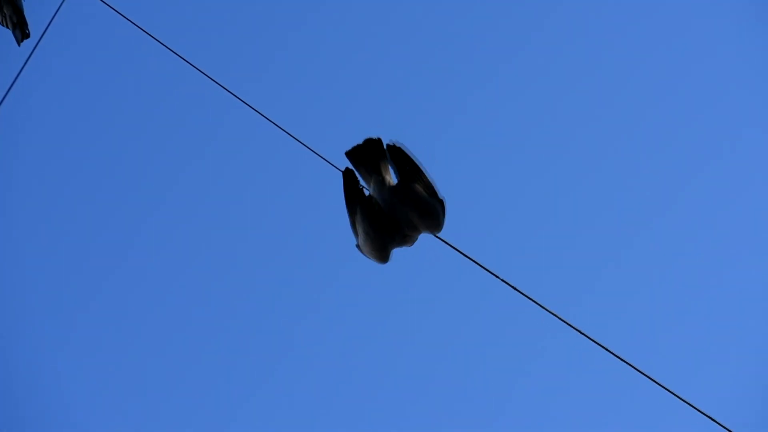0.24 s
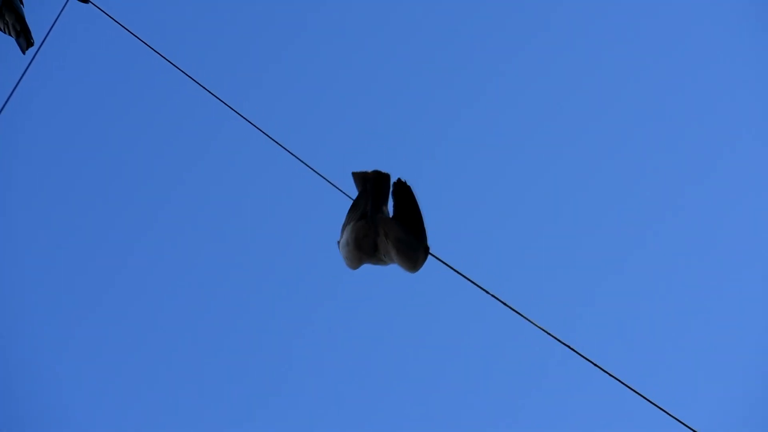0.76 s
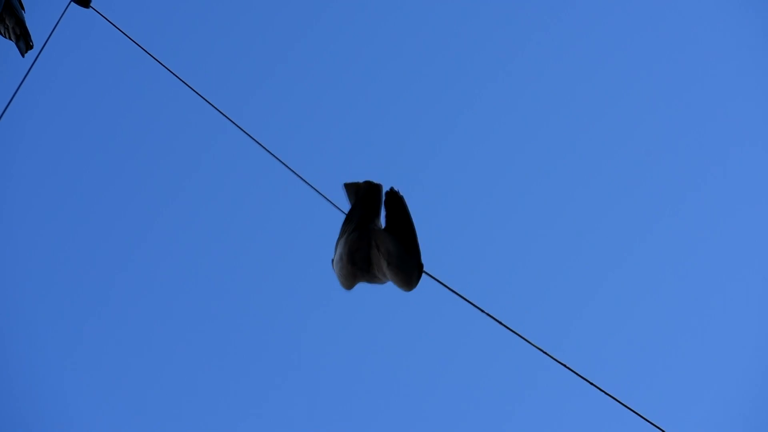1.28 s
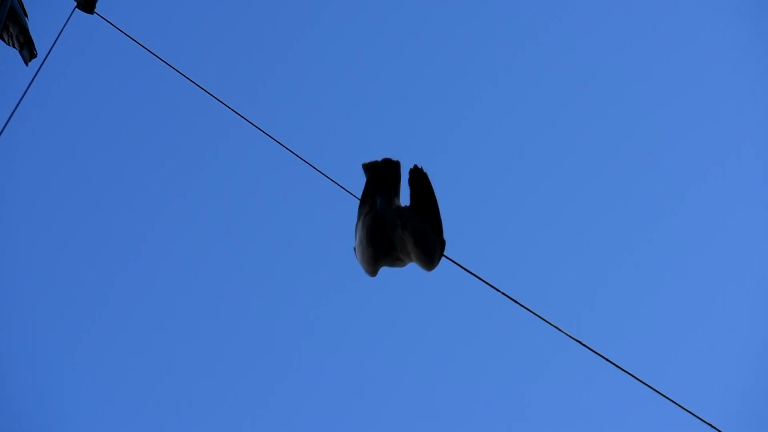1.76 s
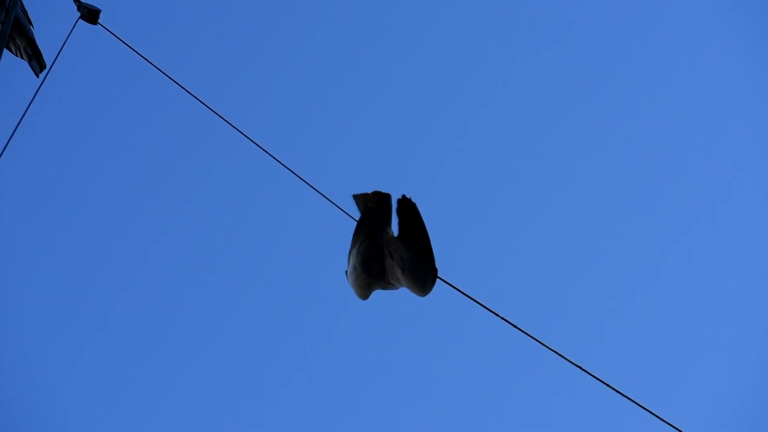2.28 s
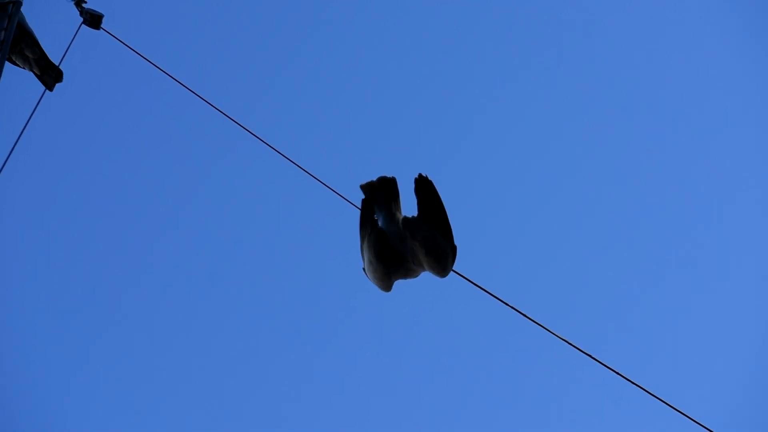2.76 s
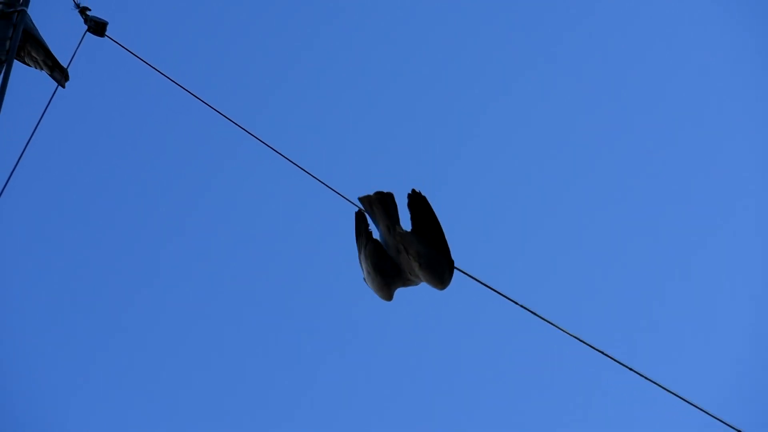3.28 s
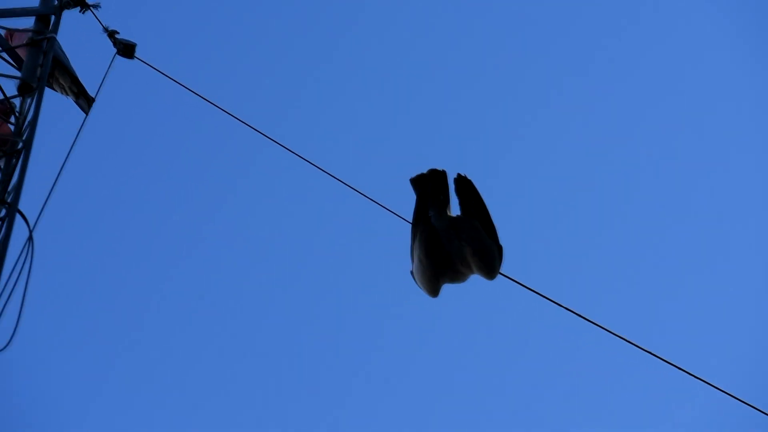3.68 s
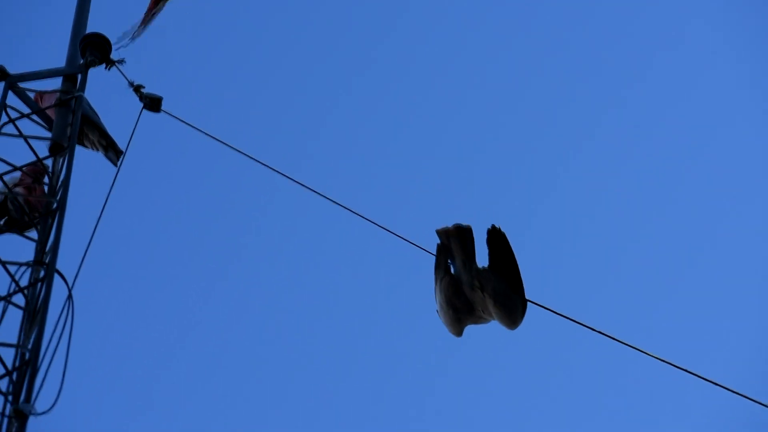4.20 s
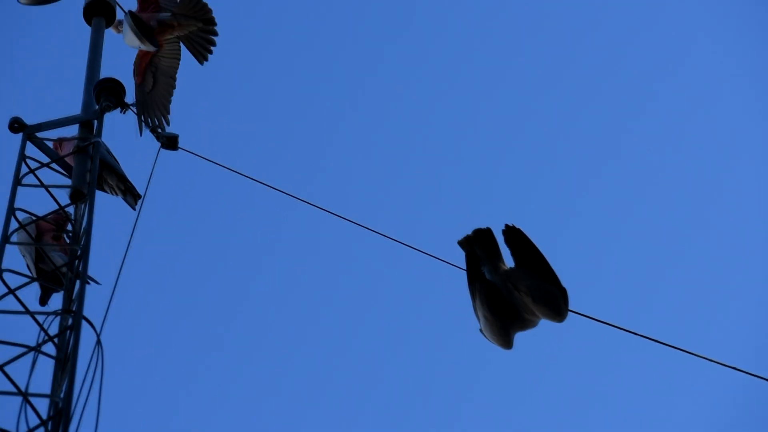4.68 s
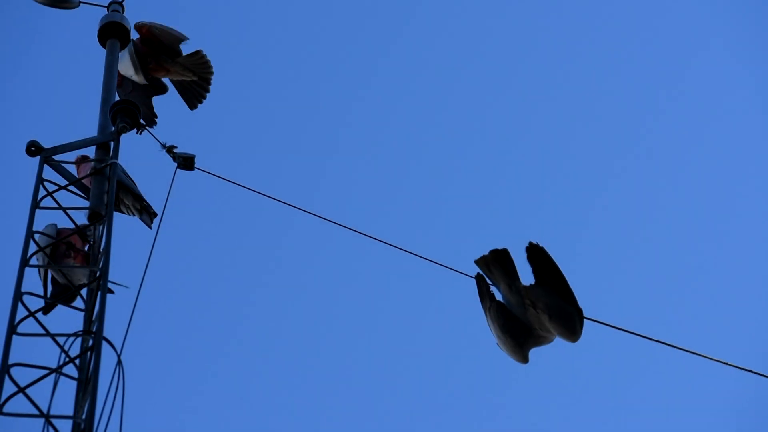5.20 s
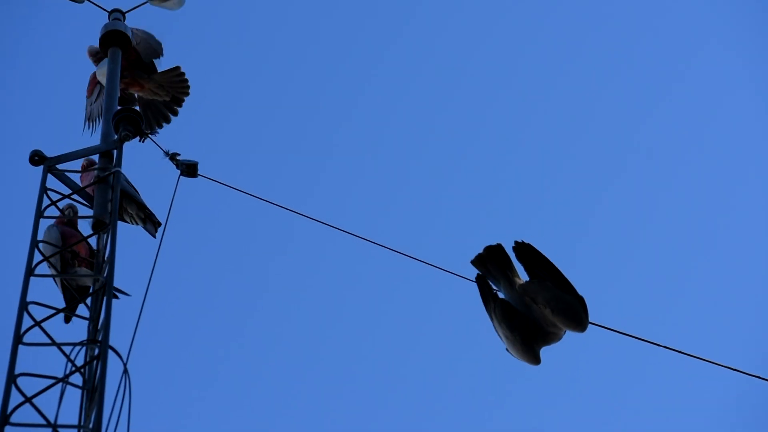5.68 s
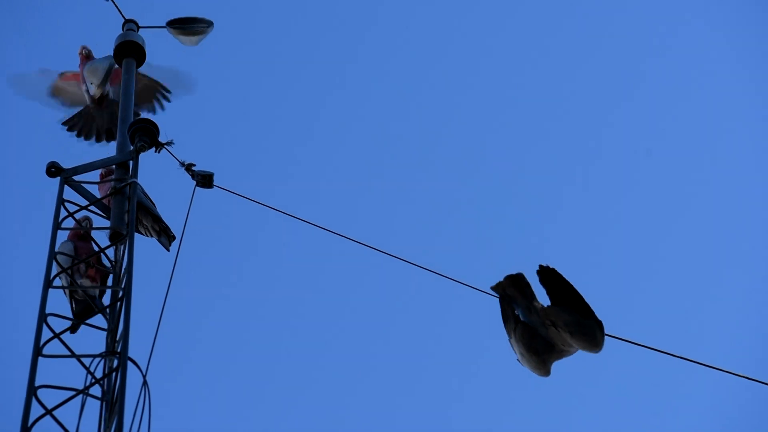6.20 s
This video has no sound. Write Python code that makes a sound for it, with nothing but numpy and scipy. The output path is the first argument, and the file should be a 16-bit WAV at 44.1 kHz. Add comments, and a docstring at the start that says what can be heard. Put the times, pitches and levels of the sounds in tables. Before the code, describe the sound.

Cockatoos squabble outdoors with two loud, shrill shrieks, harsh overlapping screeches and chirps over a soft hush.

```python
"""Outdoors by a wire and a steel mast, a stereo pair close to squabbling galahs, more off in the trees.
Each bird has two voices, a high whistle and a low buzz. Alone they give chirps and clucks; together
they beat into a harsh screech. The nearest bird shrieks twice. Feathers rustle, the mast clanks twice,
and ground, roofs and trees throw the calls back over a soft hush."""
import sys
import numpy as np
from scipy import signal
from scipy.fft import rfft, irfft, next_fast_len
from scipy.io import wavfile
from scipy.ndimage import uniform_filter1d, minimum_filter1d, map_coordinates

SR = 44100
rng = np.random.default_rng(int(sys.argv[2]) if len(sys.argv) > 2 else 0)


def unload_audio(sound):
    """Save the sound as a 16-bit wav file, at the path given as the first command line argument."""
    columns = np.transpose(np.atleast_2d(sound))
    # keep every value between -1 and 1, then stretch to whole-number steps
    steps = np.round(np.clip(columns, -1, 1) * 32767)
    wavfile.write(sys.argv[1], SR, steps.astype(np.int16))


N = 284445


def both_voices(hz, db, rasp, low_hz=770, sag=0.149):
    """The low voice chops and bends the high one into sidebands; more rasp breaks it into noisy slaps."""
    # The throat with the beak wide open. Each row: frequency in Hz, gain in dB.
    open_throat = [(500, -31.5), (2000, -22.5), (3100, -2.5), (4300, -5.5), (5400, 0), (6700, -4),
                   (8000, -7.5), (11500, -47), (16000, -24)]
    # Strength of the octave. Each row: pitch in Hz, level against the fundamental in dB.
    octave = [(2850, 0.5), (3400, -13.5), (4000, -11.5), (4700, -21)]
    count, rasp = len(hz), np.clip(rasp, 0, 1)
    low_jitter = .1 * wander(count, 110) + .05 * wander(count, 700)
    low = phase_of(low_hz * (1 + sag * np.linspace(.5, -.5, count) + low_jitter))  # sags as the call ends
    scatter = .015 * wander(count, 110) + .04 * np.sqrt(rasp) * wander(count, 700)
    phase = phase_of(hz * (1 + scatter)) + .85 * rasp * np.sin(low)
    chop = 1 + rasp * np.cos(low)  # in step with the bend, so the upper sidebands win
    overtones = amp(read(octave, hz)) * (np.sin(2 * phase) + np.sin(3 * phase) / 7)
    tone = unit(chop * (np.sin(phase) + overtones))
    slaps = colour(np.exp(2 * np.cos(low)) * rng.standard_normal(count), open_throat)
    noise_share = .45 * rasp ** 1.3
    voice = np.sqrt(1 - noise_share) * tone + np.sqrt(noise_share) * slaps
    buzz = (np.sin(low) + .7 * np.sin(2 * low)) * amp(5 * wander(count, 110))
    voice += amp(-17 - .5 * np.maximum(db + 20, -2)) * rasp * buzz  # a smaller part of loud calls
    throb_db = 2.3 * np.sqrt(rasp) * wander(count, 260)
    return unit(voice * amp(throb_db)) * amp(db) * fade(count, 0.002)


def screeches(mix, waver=0.0099, flutter_db=1.2, rise_s=0.016, fall_s=0.009):
    """The squabble: each call is one uneven swell of both voices, growing steadily harsher or cleaner."""
    # Each row: start and length in seconds, first, middle and last pitch in Hz, peak in dB,
    # place of the peak 0-1, first and last rasp 0-1.
    calls = [ (0.89, 0.13, 3560, 3817, 3700, -30, 0.78, 0.3, 0.089),
             (0.99, 0.15, 4270, 4210, 3875, -33.5, 0.27, 0.58, 0.92),
             (1.122, 0.026, 4290, 4170, 4040, -20, 0.73, 0.28, 0.11),
             (1.15, 0.14, 3920, 3960, 3810, -32.5, 0.13, .08, 0.28),
             (1.436, 0.0357, 3990, 4280, 4480, -16, 0.46, .6, 0.77),
             (1.585, 0.098, 3840, 3980, 3840, -38.5, .4, 0.19, 0.33),
             (1.89, 0.12, 4130, 3860, 3800, -37, 0.91, 0.87, .3),
             (1.98, 0.069, 3810, 3694, 3490, -27, 0.24, .05, 0.21),
             (2.13, .16, 3870, 3930, 3675, -29.5, 0.51, 0.23, 0.066),
             (2.452, 0.09, 3430, 3400, 3403, -24, 0.97, 0.36, 0.022),
             (2.53, 0.096, 2687, 2800, 2803, -25.5, 0.21, 0.22, 0.12),
             (2.645, 0.064, 3830, 3564, 3160, -23.5, 0.92, 0.66, .1),
             (2.703, .11, 2755, 2858, 2816, -25, 0.24, 0.11, 0.22),
             (3.785, 0.059, 3830, 3760, 3870, -39, 0.23, 0.042, .07),
             (3.89, .18, 3840, 3700, 3650, -38.5, 0.14, .03, 0.43),
             (4.07, 0.13, 4240, 4480, 4550, -38.5, 0.15, 0.22, 0.39),
             (4.19, 0.16, 3760, 3698, 3580, -34.5, 0.37, .03, 0.28),
             (4.34, 0.12, 3630, 3526, 3516, -36, 0.96, .5, 0.26),
             (5.003, 0.0435, 3890, 4004, 4100, -23, 0.65, 0.12, 0.36),
             (5.037, 0.11, 4014, 4030, 3970, -21.5, 0.1, 0.25, 0.97),
             (5.15, 0.127, 3743, 3796, 3710, -22.5, 0.16, 0.088, 0.88),
             (5.25, 0.16, 3750, 3840, 3866, -24, 0.36, 0.75, 0.29),
             (5.35, .11, 4220, 4330, 4280, -26.5, 0.35, 0.52, 0.86),
             (5.47, 0.14, 3693, 3990, 3876, -21, .42, 0.61, 1),
             (5.64, 0.22, 3484, 3174, 3410, -23, 0.34, 0.88, 0.32),
             (5.71, .15, 3880, 3883, 3780, -21, 0.32, 0.47, 0.75),
             (5.86, 0.15, 3740, 3730, 3770, -36.5, 0.38, 1, .2),
             (5.988, 0.13, 3980, 4800, 4760, -17, 0.53, 0.71, 0.63),
             (6.2, .19, 3876, 4000, 3967, -13.5, 0.45, 0.41, 0.64), ]
    for start, length, *pitches, db, peak_at, first_rasp, last_rasp in calls:
        u = progress(length)
        effort = wander(len(u), 60)  # moves pitch and level together
        hz = bow(u, *pitches) * (1 + waver * effort)
        level_db = db + swell(u, peak_at, edge_db=11.5, power=1.78) + flutter_db * effort
        rasp = first_rasp + (last_rasp - first_rasp) * u
        ramps = np.minimum(1, length * np.minimum(u / rise_s, (1 - u) / fall_s))
        place(mix, start, both_voices(hz, level_db, rasp) * ramps, wet_db=-2.5)


def shrieks(mix, rasp_hz=3950, drop_hz=1484, drop_s=0.0084, shrill_hz=5250, catch_s=0.0073):
    """The nearest bird: a rasp drops onto its pitch, then breaks into a shrill tone that dips and climbs."""
    # Each row: start, rasp length and tone length in seconds, pitch at the tone's dip in Hz, peak in dB.
    calls = [(0.377, .042, .042, 4680, -4), (0.619, .039, .043, 4560, -4)]
    for start, rasp_s, tone_s, dip_hz, db in calls:
        u, v = progress(rasp_s), progress(tone_s)
        falling_hz = rasp_hz + drop_hz * np.exp(-(u * rasp_s / drop_s) ** 2)
        rasp_db = db - 5 + swell(u, peak_at=0.56, edge_db=11.5, power=2)
        rasp = both_voices(falling_hz, rasp_db, rasp=0.41)
        tone_hz = dip_hz + (shrill_hz - dip_hz) * np.cos(np.pi * v) ** 2
        tone_db = db + swell(v, peak_at=0.66, edge_db=11.5, power=2)
        fray = 0.031 + 0.48 * (2 * v - 1) ** 4  # clean in the middle, rough at the ends
        tone = both_voices(tone_hz, tone_db, fray) * np.minimum(1, v * tone_s / catch_s)
        place(mix, start, np.concatenate([rasp, tone]), wet_db=-5.5)


def high_voice(hz, db, octave_db):
    """The whistle alone: a hoarse tone with an octave and three weak overtones above that."""
    count = len(hz)
    phase = phase_of(hz * (1 + .012 * (wander(count, 200) + wander(count, 900))))
    upper = sum(amp(under_octave_db) * np.sin(k * phase) * (k * hz < SR / 2)
                for k, under_octave_db in [(3, -22), (4, -33), (5, -44)])
    tone = np.sin(phase) + amp(octave_db) * (np.sin(2 * phase) + upper)
    shimmer_db = 1.3 * wander(count, 250) + wander(count, 1500)
    return np.sqrt(2) * tone * amp(db + shimmer_db) * fade(count, 0.00099)


def chirps(mix, waver=0.0135):
    """Wavering glides of the high voice; the octave flares as it passes the throat's resonance."""
    # Each row: start and length in seconds, first, middle and last pitch in Hz, peak in dB,
    # place of the peak 0-1, brightness in dB.
    notes = [ (0.0, 0.052, 2140, 2106, 2160, -42, 0.046, -16),
             (0.149, 0.01, 2750, 3440, 3400, -35, 0.55, -10), (0.164, 0.019, 2340, 2604, 2680, -35, 0.2, 1),
             (0.179, 0.019, 2600, 2438, 2190, -27.5, 0.4, 6), (0.26, .07, 2900, 2850, 2730, -45, 0.27, 2),
             (0.315, .047, 2710, 2934, 3690, -33.5, 1, 3.5), (0.363, 0.015, 5100, 4520, 3820, -12, 0.7, 1),
             (0.55, 0.078, 2110, 1957, 1490, -43.5, 0.58, -14),
             (0.583, 0.023, 2950, 3210, 3500, -22.5, .6, 0),
             (0.607, 0.0099, 3350, 3620, 4600, -8.5, 0.71, 6.5),
             (0.825, 0.032, 2450, 2525, 2200, -39.5, 0.27, -16),
             (1.1, 0.045, 2750, 2250, 2150, -30.5, 0.66, -6), (1.28, 0.043, 2230, 2510, 2980, -32, 1, -17),
             (1.318, 0.08, 2960, 3114, 2850, -26.5, 0.46, -3),
             (1.375, 0.058, 2874, 2538, 2435, -26.5, 0.62, 4.5),
             (1.43, 0.012, 4030, 4060, 4050, -10.5, 0.78, 13),
             (1.44, .012, 3730, 3590, 4030, -4.5, 0.61, 2), (1.45, 0.0077, 4980, 4720, 4600, -5, 0.64, -4),
             (1.765, 0.08, 2050, 2083, 1945, -38.5, 0.16, -10),
             (2.135, 0.067, 2220, 2056, 1605, -31, 0.77, -12), (2.24, .08, 1750, 1556, 1515, -40, 0.68, -7),
             (3.118, .057, 2750, 2168, 2010, -29, 0.56, 1.5), (3.18, .08, 2003, 2252, 2190, -29, 0.56, 4),
             (3.619, .15, 2230, 2310, 2790, -48.5, 0.27, -24),
             (3.899, 0.066, 2080, 1908, 2240, -35.5, 0.6, -6),
             (4.28, 0.063, 2950, 2335, 2020, -30, .82, -20),
             (4.335, .12, 2512, 2536, 2446, -28, 0.06, -2.5),
             (4.755, 0.083, 2790, 3017, 3070, -32.5, 1, -4),
             (4.809, .048, 2910, 2355, 2216, -27.5, 0.82, -2.5),
             (4.85, 0.044, 2330, 2555, 2490, -27, .4, -8), (4.88, 0.02, 3150, 3760, 4040, -24.5, .55, 6),
             (5.479, .017, 2540, 2690, 2860, -30, 0.6, -10), (5.625, .02, 2500, 2642, 2350, -27, 0.57, -8),
             ]
    # The throat's lift of the octave. Each row: pitch of the note in Hz, gain in dB.
    octave_lift = [(1600, -12), (2000, 1.5), (2400, 3.5), (2700, -3), (3100, -7.5), (3600, -24)]
    for start, length, *pitches, db, peak_at, bright_db in notes:
        u = progress(length)
        hz = bow(u, *pitches) * (1 + waver * wander(len(u), 246.6))
        level_db = db + swell(u, peak_at, edge_db=15, power=1.34)
        place(mix, start, high_voice(hz, level_db, bright_db + read(octave_lift, hz)), wet_db=-7.5)


def clucks(mix, waver_per_s=0.56):
    """The low voice alone: short stacks of harmonics; the longer the note, the more its pitch wavers."""
    # Each row: start and length in seconds, first and last pitch in Hz, level in dB.
    notes = [(0.456, 0.012, 774, 780, -27), (0.697, 0.015, 787, 764, -25.5),
             (1.002, 0.045, 651, 563.5, -31), (1.456, 0.011, 760, 687, -20),
             (2.092, 0.029, 567, 641, -29.5), (3.097, 0.02, 665, 634, -26.5),
             (3.258, 0.027, 515, 447, -32.5), (4.315, 0.019, 408, 490, -35.5),
             (4.378, 0.046, 594.5, 640.6, -33), (4.435, 0.011, 501, 440, -34),
             (4.902, 0.022, 530, 433, -32.5), (5.05, 0.047, 852, 795, -29.5),
             (5.168, 0.084, 750, 604, -33.5), (5.314, 0.082, 760, 615, -34.5)]
    # The throat with the beak nearly shut. Each row: frequency in Hz, gain in dB.
    shut_throat = [(450, -5), (900, -2.5), (1300, 3.5), (1900, -7.5), (3100, -2.5), (4000, -9), (5500, -11),
                   (8000, -17.5), (11000, -62)]
    for start, length, first_hz, last_hz, db in notes:
        count = round(length * SR)
        hz = np.linspace(first_hz, last_hz, count) * (1 + waver_per_s * length * wander(count, 349.5))
        phase = phase_of(hz)
        stack = sum(amp(read(shut_throat, k * hz)) * np.cos(k * phase + rng.uniform(0, np.pi))
                    for k in range(1, 20))
        cluck = unit(stack * amp(2.5 * wander(count, 200))) * fade(count, .004)
        place(mix, start, amp(db) * cluck, wet_db=-8.5)


def rustles(grains_per_s=1600, grain_t60=0.01):
    """Feathers, claws and wings: bursts of tiny ringing scratches that rise quickly and trail off."""
    # Each row: start and length in seconds, level in dB,
    # upper edge of the rustle's loudest band in Hz (it peaks an octave lower).
    bursts = [(1.825, 0.087, -46.5, 14800), (1.975, 0.17, -43, 8200), (2.291, 0.11, -48, 9200),
              (2.445, 0.43, -45, 490), (2.966, 0.17, -45, 16300), (3.403, 0.17, -53.5, 434),
              (6.29, 0.2, -42.5, 14700)]
    out = np.zeros(N)
    for start, length, db, hz in bursts:
        count = round(length * SR)
        t = np.arange(count) / SR
        scratches = rng.standard_normal(count) * (rng.random(count) < grains_per_s / SR) * (1 - t / length)
        ring = rng.standard_normal(count) * amp(-60 * t / grain_t60)
        grains = signal.fftconvolve(scratches, ring)[:count]
        grains *= amp(2.5 * wander(count, 60)) * fade(count, .012)
        band = [(hz / 8, -25), (hz / 2, 0), (hz, -2), (hz * 2, -8), (hz * 8, -35)]
        add(out, start, amp(db) * colour(grains, band))
    return out


def mast_clanks(ring_gain=0.5, rattle_gain=1.417, rattle_t60=0.45):
    """A blow rings the steel mast and sets loose parts rattling."""
    # Each row: start in seconds, level in dB.
    knocks = [(2.853, -35), (3.403, -35.5)]
    # The mast's modes. Each row: frequency in Hz, level in dB, time to fall 60 dB in seconds.
    modes = [(3410, 2.5, 0.38), (4200, -4.5, 0.47), (5082, -13, 0.28), (6600, -10, 0.47)]
    rattle_spectrum = [(150, -9.5), (1300, 5), (2200, -2), (3300, 10), (7000, -3), (11000, -29)]
    out, t = np.zeros(N), np.arange(SR // 2) / SR
    for start, db in knocks:
        ring = sum(amp(mode_db - 60 * t / t60) * np.sin(2 * np.pi * (hz * t + rng.random()))
                   for hz, mode_db, t60 in modes)
        rattle = colour(rng.standard_normal(len(t)), rattle_spectrum) * amp(-60 * t / rattle_t60)
        add(out, start, amp(db) * (ring_gain * ring + rattle_gain * rattle))
    return out


def far_flock(count=24, level_db=-53):
    """Birds off in the trees: faint falling chirps at chance moments."""
    out = np.zeros(N)
    for when, pitch, length in rng.random((count, 3)):
        hz = (1600 + 2400 * pitch) * (1 - .15 * progress(.04 + .08 * length))
        add(out, when * N / SR, high_voice(hz, level_db, octave_db=-8))
    return out


def echoes(x, taps_per_s=2500, early_db=9.5, early_t60=0.22, apart=0.99):
    """Ground, roofs and trees: a quick scatter of reflections, then a thin tail that loses its treble."""
    # Each row: frequency in Hz, time for the tail to fall 60 dB in seconds.
    tail_t60 = [(300, 0.15), (1500, 1), (4500, 0.46), (8000, 0.26), (14000, 0.022)]
    t = np.arange(SR) / SR
    taps = rng.standard_normal((3, SR)) * (rng.random((3, SR)) < taps_per_s / SR) * (t > .004)
    taps *= 1 + amp(early_db - 60 * t / early_t60)
    hz, frame_s, spectra = signal.stft(taps, SR, nperseg=256)
    decay = amp(-60 * frame_s / read(tail_t60, hz)[:, None])
    both, left, right = signal.istft(spectra * decay, SR, nperseg=256)[1]
    tail = both + apart * np.array([left, right])
    return signal.fftconvolve(x[None], tail / np.linalg.norm(tail[0]), axes=1)[:, :N]


def air(level_db=-46.5):
    """Outdoor hush with drifting patches, partly shared by the two microphones."""
    # Each row: frequency in Hz, relative noise density in dB.
    hush = [(15, -52), (25, -14), (157, -5.5), (486, -1.5), (654, -1.5), (1390, -1.5), (1780, -8),
            (3490, -3), (7420, -10), (8270, -15.5), (15800, -20)]
    hz, _, spectra = signal.stft(rng.standard_normal((3, N)), SR, nperseg=2048)
    patches = uniform_filter1d(rng.standard_normal(spectra.shape[1:]), size=14, axis=0)
    patch_db = unit(uniform_filter1d(patches, size=5, axis=1))
    spectra *= amp(read(hush, hz)[:, None] + patch_db)
    both, left, right = signal.istft(spectra, SR, nperseg=2048)[1][:, :N]
    return amp(level_db) * unit(both + np.array([left, right]))


def place(mix, start, sound, wet_db, wet_slope=0.16):
    """Splits a call into direct sound and echo feed: the fainter the bird, the farther and wetter."""
    peak_db = 10 * np.log10(uniform_filter1d(sound ** 2, size=400).max() + 1e-12)
    wet = amp(wet_db - wet_slope * (peak_db + 30))
    add(mix, start, np.array([[1], [wet]]) / np.hypot(1, wet) * sound)


def progress(length):
    """Runs from 0 to 1 over a note, sample by sample."""
    return np.linspace(0, 1, round(length * SR))


def bow(u, first, middle, last):
    """The pitch of a note: one smooth arch or dip."""
    return first + (last - first) * u + (middle - (first + last) / 2) * 4 * u * (1 - u)


def swell(u, peak_at, edge_db, power):
    """The level of a note in dB: it starts and ends edge_db under its peak."""
    peak_at = np.clip(peak_at, .02, .98)
    return -edge_db * np.maximum(1 - u / peak_at, (u - peak_at) / (1 - peak_at)) ** power


def phase_of(hz):
    """Running phase of a pitch curve."""
    return 2 * np.pi * np.cumsum(hz) / SR


def wander(count, rate_hz):
    """A smooth random curve of rms about 1 that takes a new value rate_hz times a second."""
    positions = np.arange(count) * rate_hz / SR
    return map_coordinates(rng.standard_normal(count), [positions], order=3, mode="wrap")


def fade(count, edge_s):
    """Soft start and end."""
    return signal.windows.tukey(count, min(1, 2 * edge_s * SR / count))


def colour(x, spectrum):
    """Filters a sound by rows of frequency in Hz and gain in dB, and scales it to rms 1."""
    size = next_fast_len(2 * len(x))
    gain = amp(read(spectrum, np.fft.rfftfreq(size, 1 / SR)))
    return unit(irfft(rfft(x, size) * gain, size)[:len(x)])


def read(points, hz):
    """Reads a table on a log-frequency axis."""
    f, value = np.transpose(points)
    return np.interp(np.log(hz + 1), np.log(f + 1), value)


def amp(db):
    """Decibels to gain."""
    return 10 ** (np.asarray(db) / 20)


def unit(x):
    """Scales to rms 1."""
    return x / np.sqrt(np.mean(x ** 2) + 1e-20)


def add(mix, start, sound):
    """Mixes a sound in at a time in seconds."""
    part = mix[..., max(round(start * SR), 0):][..., :sound.shape[-1]]
    part += sound[..., :part.shape[-1]]


def scene():
    """At the pair: near birds and small noises with their echoes, the far flock as echo only, the hush."""
    # Calls reach the left microphone first. Each row: frequency in Hz, its lead in radians.
    left_lead = [(1000, 0.5), (6000, 0.81), (8000, 1.66), (10000, 2.45), (14000, 2.2)]
    # Where the callers sit. Each row: time in seconds, left minus right in dB.
    bearing = [(0, -4), (1.0, -2), (1.45, -5.5), (1.6, -1.5), (3.2, -3.5), (4.9, -3), (5.7, -0.4),
               (6.4, -1)]
    mix = np.zeros((2, N))
    for calls in (chirps, screeches, shrieks, clucks):
        calls(mix)
    direct, wet = mix
    noises = rustles() + mast_clanks()
    lag = read(left_lead, np.fft.rfftfreq(N, 1 / SR))
    right = irfft(rfft(direct) * np.exp(-1j * lag), N)
    heard = np.array([direct, right]) + noises + echoes(wet + .5 * noises + far_flock())
    pan_db = np.interp(np.arange(N) / SR, *np.transpose(bearing))
    return heard * amp(np.array([pan_db, -pan_db]) / 2) + air()


def record(dry):
    """The recorder: a fast limiter holds the nearest calls to full scale, then a steep treble cut."""
    allowed_gain = 1 / np.maximum(abs(dry).max(0), 1)
    gain = uniform_filter1d(minimum_filter1d(allowed_gain, size=90), size=90)
    lowpass = signal.firwin(511, cutoff=15900, window=("kaiser", 9), fs=SR)
    return signal.oaconvolve(dry * gain, lowpass[None], "same")


dry = scene()
out = record(dry)
unload_audio(out)
```